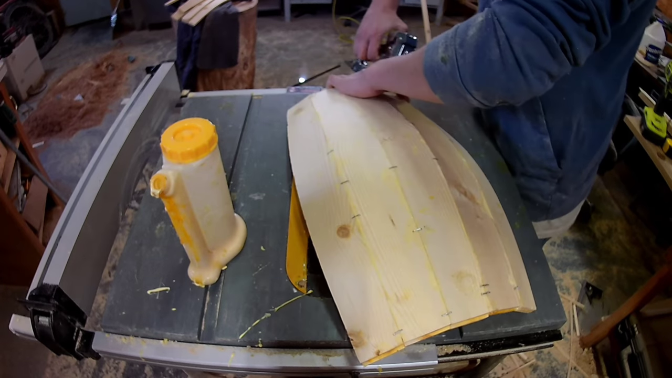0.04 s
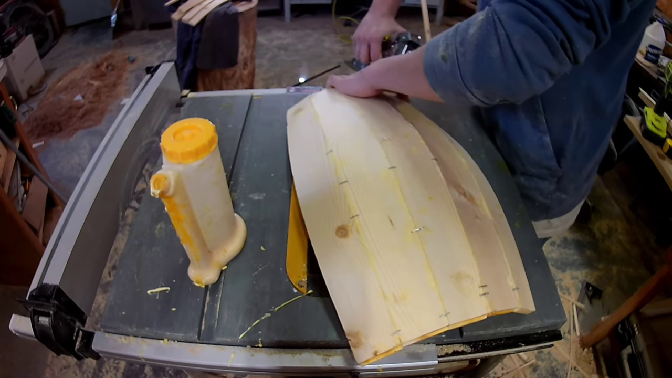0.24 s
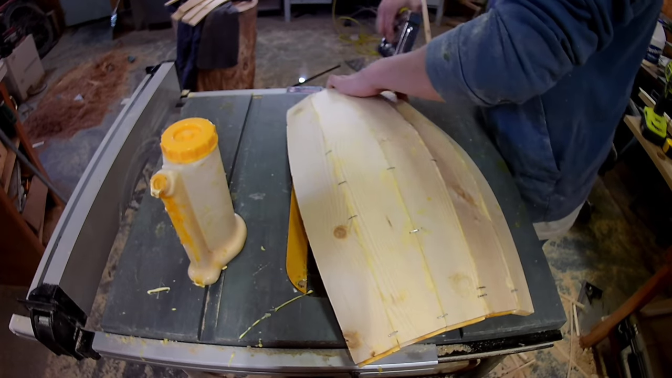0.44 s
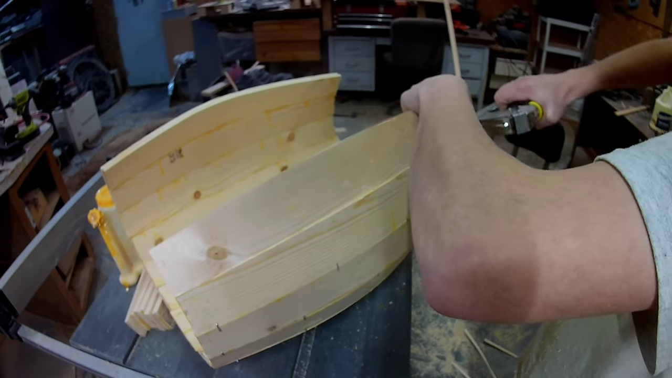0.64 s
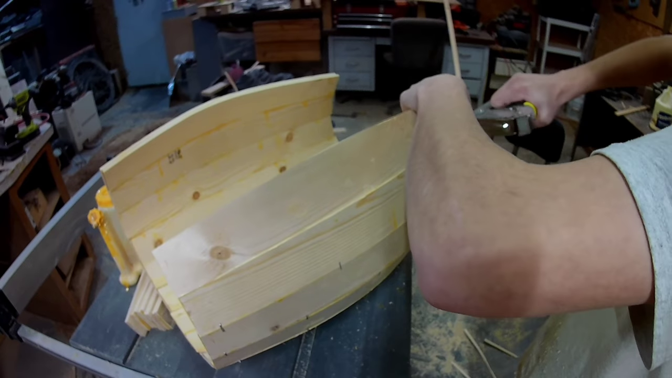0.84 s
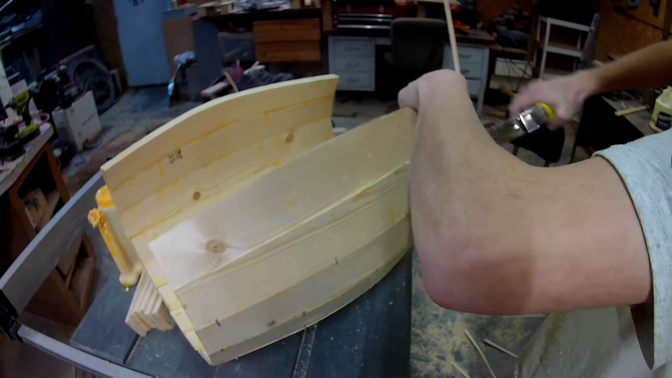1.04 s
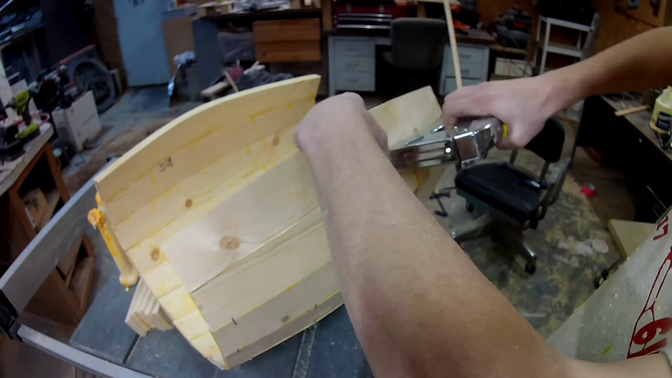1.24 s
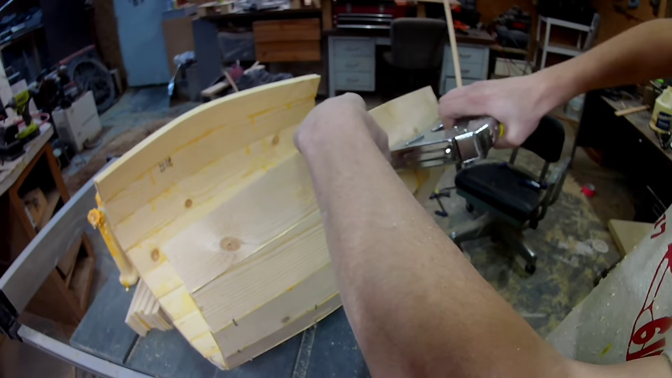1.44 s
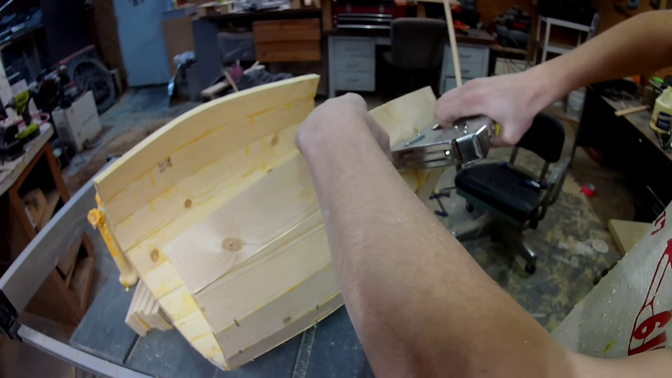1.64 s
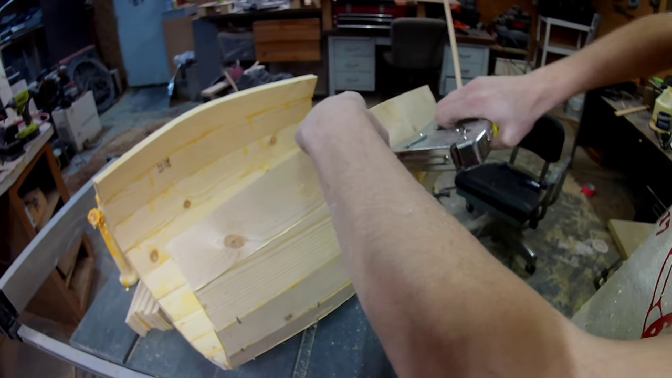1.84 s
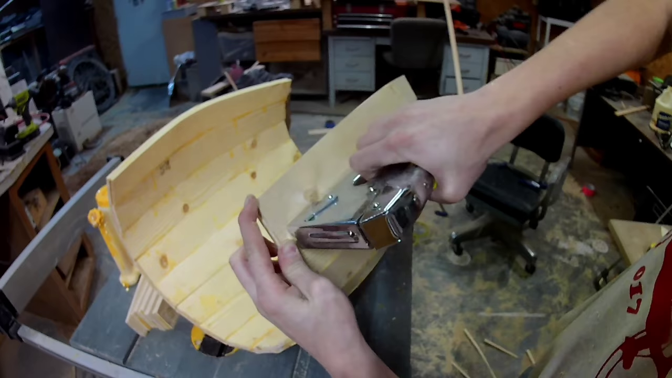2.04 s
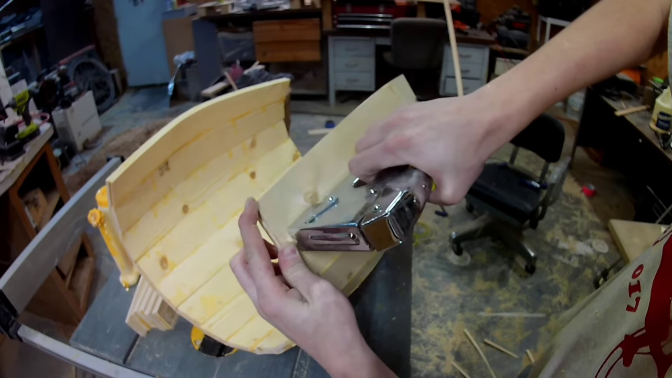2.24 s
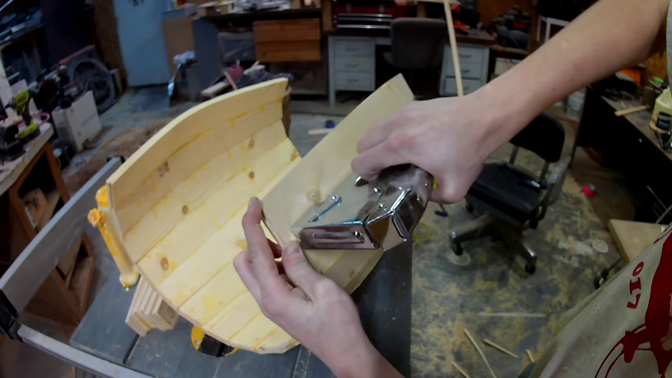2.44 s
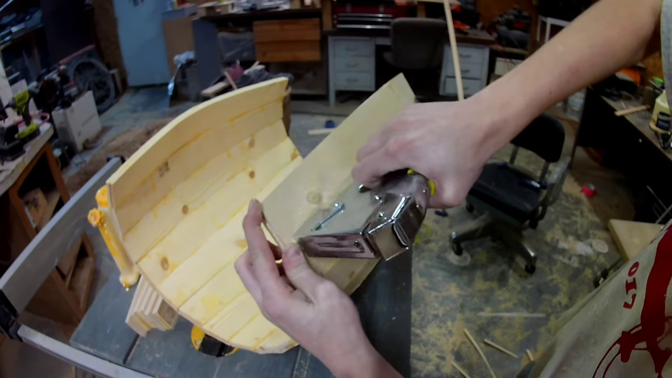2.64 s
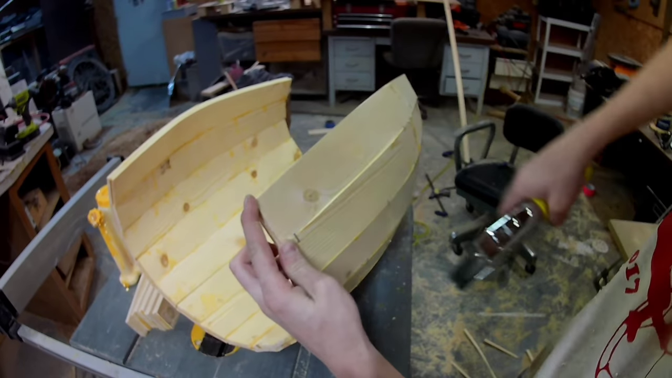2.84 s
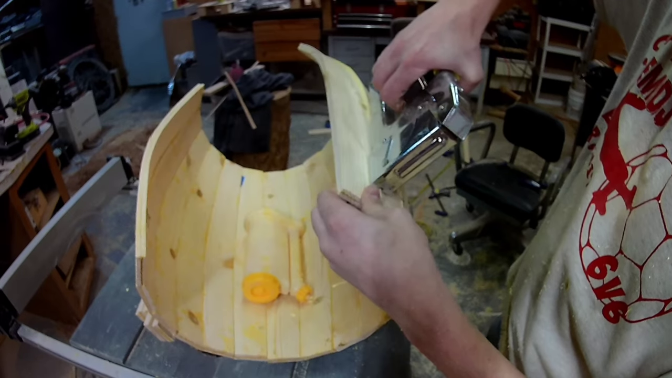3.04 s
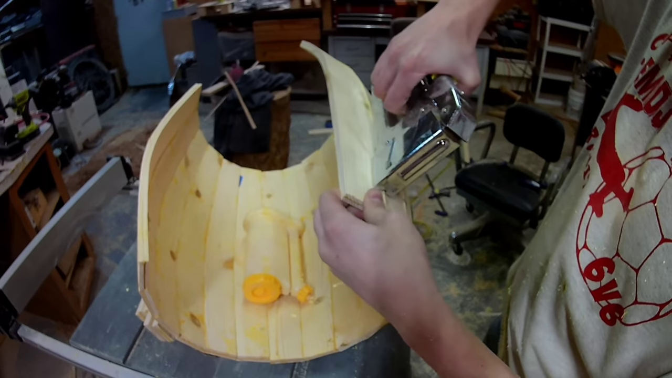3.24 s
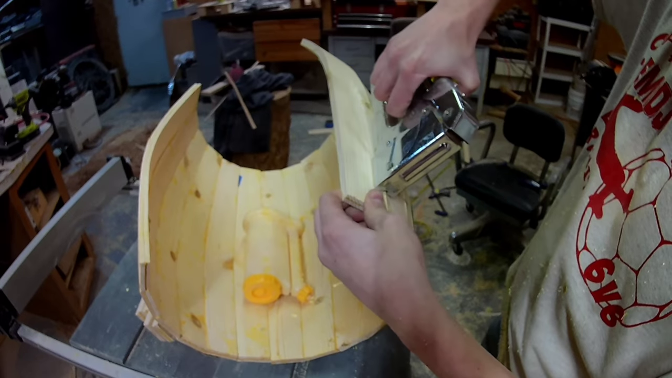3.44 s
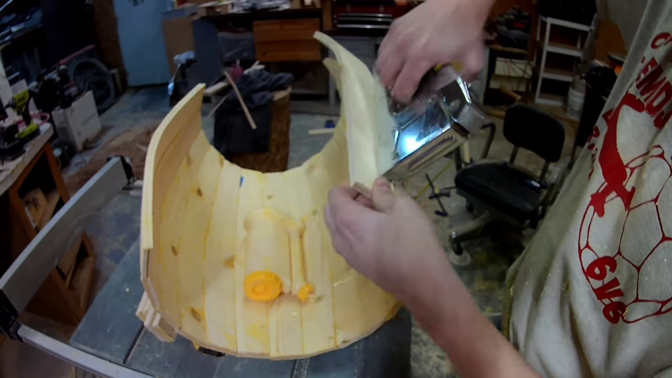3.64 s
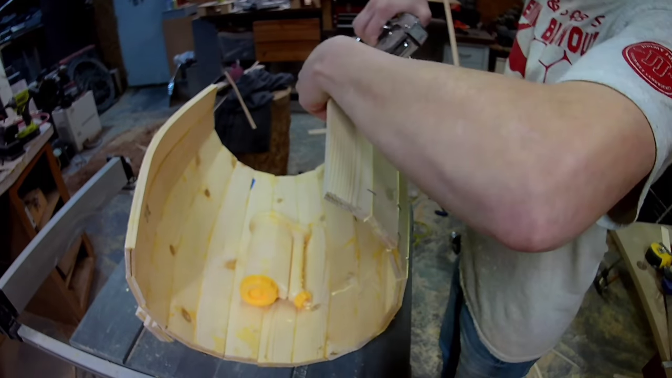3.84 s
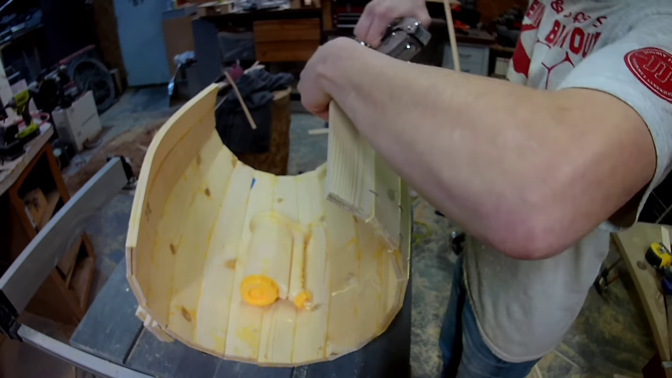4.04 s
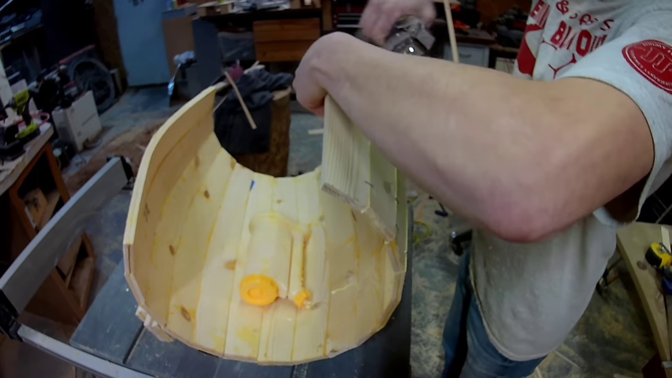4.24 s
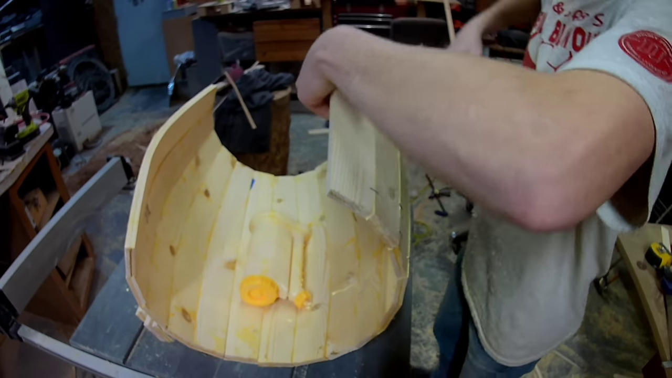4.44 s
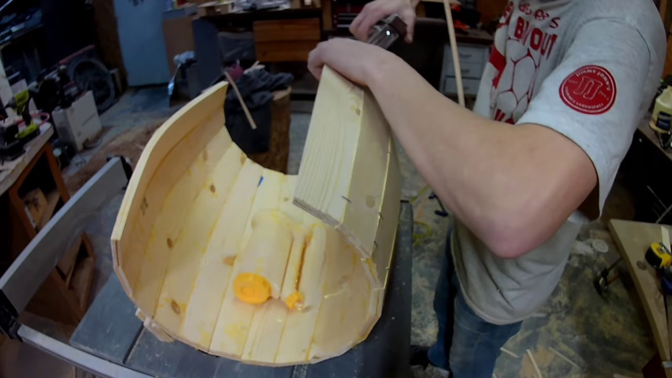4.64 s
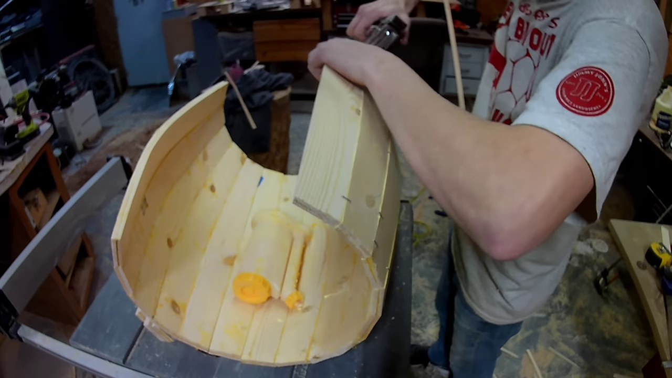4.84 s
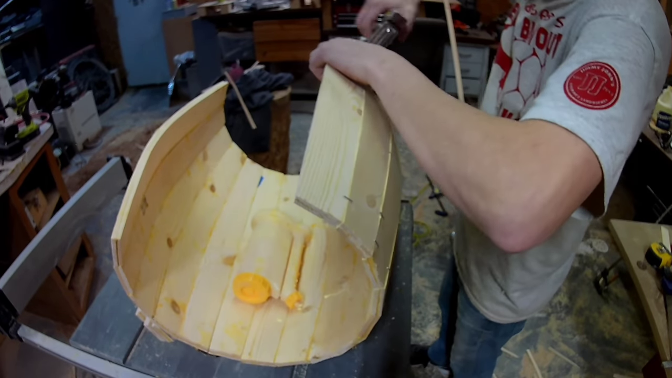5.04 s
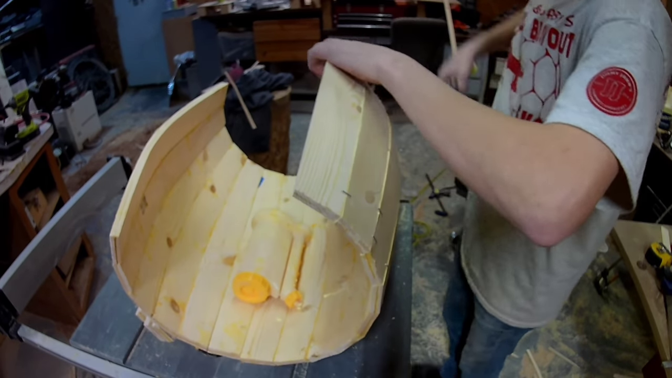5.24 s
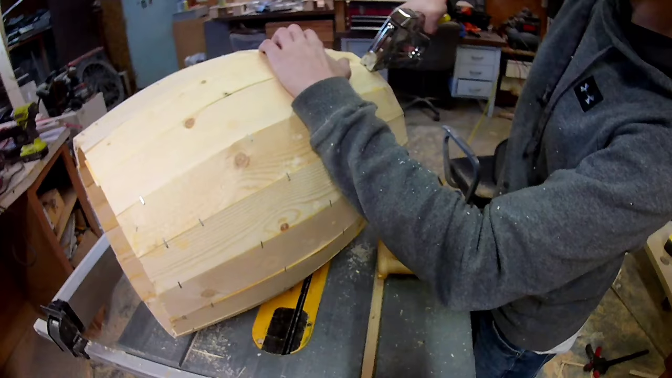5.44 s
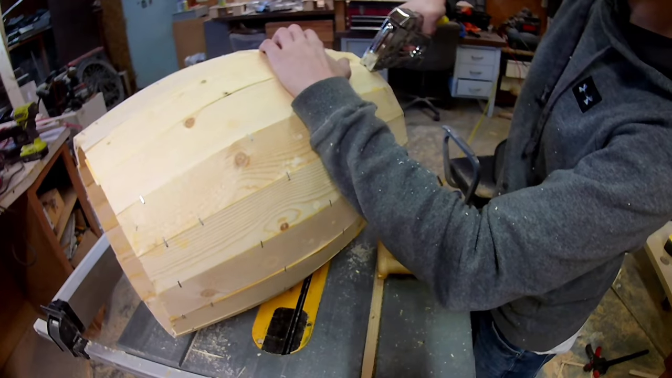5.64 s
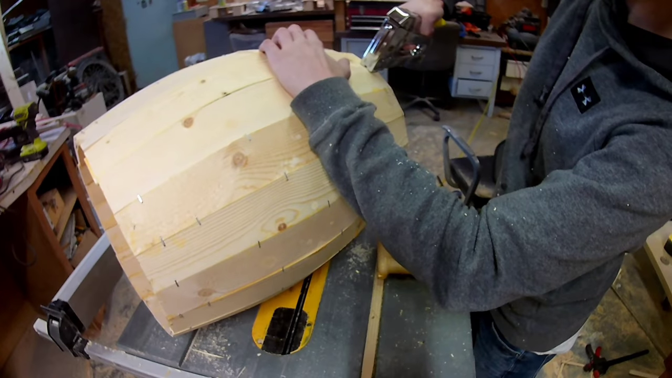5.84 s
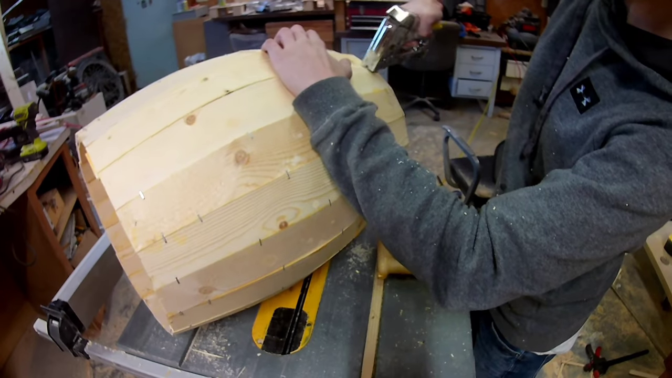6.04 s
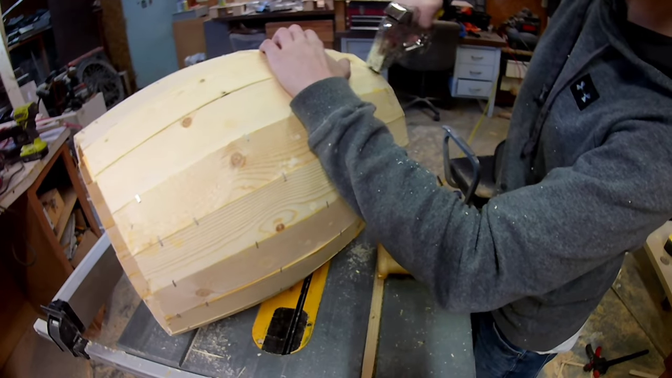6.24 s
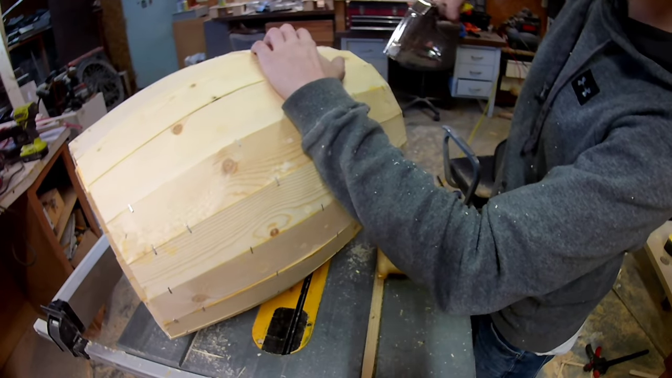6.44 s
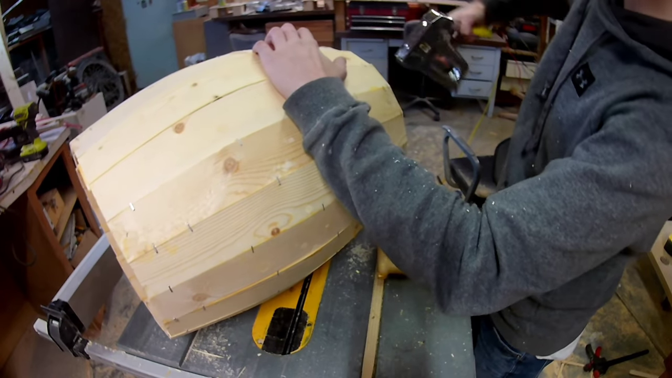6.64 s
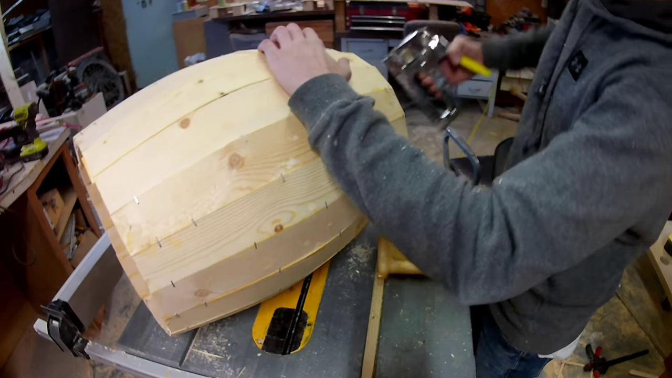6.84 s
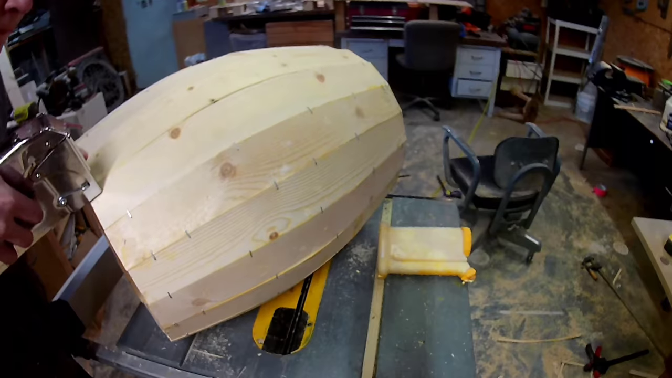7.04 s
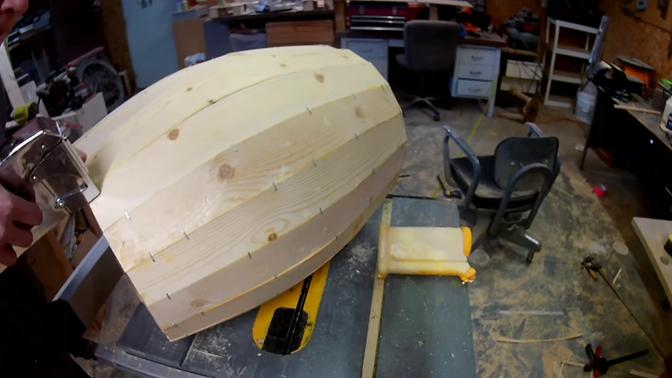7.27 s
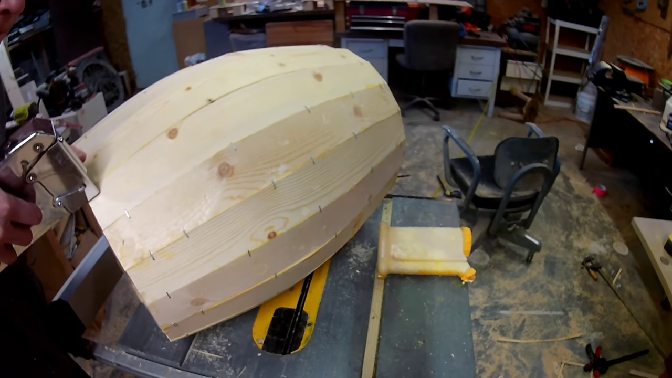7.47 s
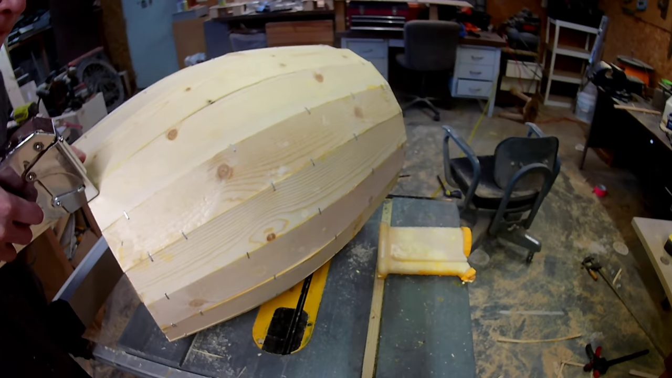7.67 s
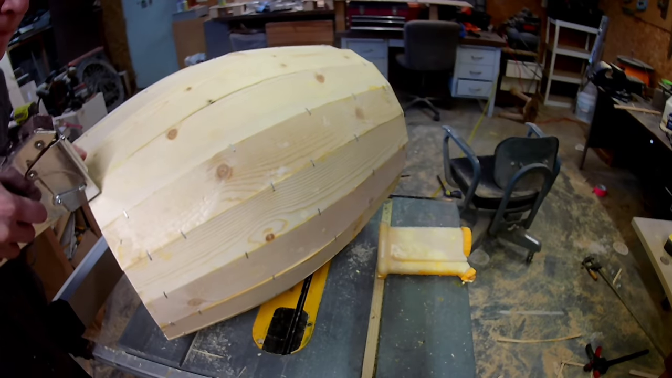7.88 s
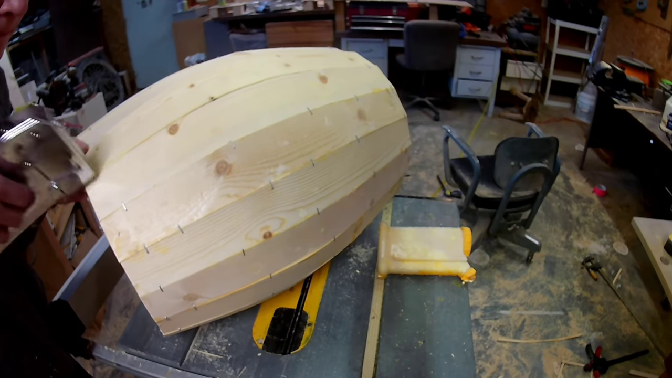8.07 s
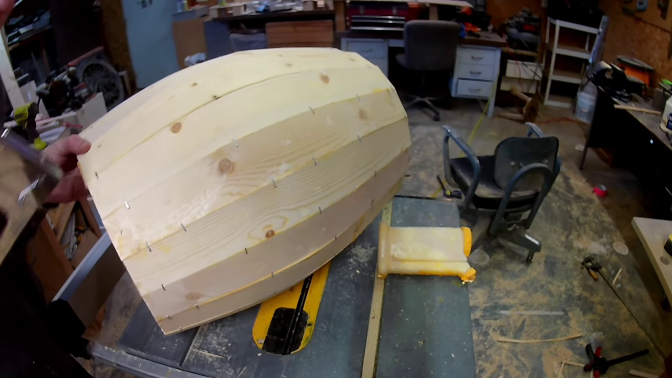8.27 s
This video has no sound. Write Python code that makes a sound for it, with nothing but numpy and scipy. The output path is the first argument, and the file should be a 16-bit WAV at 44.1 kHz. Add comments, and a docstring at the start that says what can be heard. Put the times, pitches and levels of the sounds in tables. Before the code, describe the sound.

Nine spaced staple shots snap and knock into a wooden barrel shell, then ring louder and hollower on the closed barrel over a machine drone.

```python
"""Staple gun on pine staves

In a workshop, a spring staple gun tacks pine staves, first on an open shell, then on a closed barrel.
Each squeeze ticks the catch, drives the striker into the wood and lets the lever clack back; the shop answers.
Behind it, in stretches with abrupt edges: still air, a fan, a humming motor.
Knocks are damped modes, cracks are bursts of coloured noise; the loudest shots overload the microphone.
"""
import sys
import numpy as np
from scipy import signal
from scipy.fft import rfft, irfft, next_fast_len
from scipy.io import wavfile
from scipy.ndimage import map_coordinates

SR = 44100
rng = np.random.default_rng(int(sys.argv[2]) if len(sys.argv) > 2 else 0)


def store_pcm(level_fs):
    """Save levels as 16-bit WAV."""
    pcm = np.round(np.clip(level_fs, -1, 1) * 32767).astype(np.int16)
    wavfile.write(sys.argv[1], SR, np.atleast_2d(pcm).T)


N = 366471
T = np.arange(int(.55 * SR)) / SR  # time axis of one struck sound, s
CLOSED_FROM_S = 5.44  # from here on the work is the closed barrel


def amp(db):
    """Decibels to gain."""
    return 10 ** (np.asarray(db) / 20)


def unit(x):
    """Scale to rms 1."""
    return x / np.sqrt(np.mean(x ** 2) + 1e-20)


def along(points, hz):
    """Read a curve of (f/Hz, value) points on a log frequency axis."""
    f, value = np.transpose(points)
    return np.interp(np.log(hz + 1), np.log(f + 1), value)


def filtered(x, gain):
    """Multiply the spectrum of x by a gain that depends on frequency."""
    n = x.shape[-1]
    padded = next_fast_len(n + 8192)
    hz = np.fft.rfftfreq(padded, 1 / SR)
    return irfft(rfft(x, padded) * gain(hz), padded)[..., :n]


def noise(spectrum, size):
    """Coloured noise of rms 1."""
    return unit(filtered(rng.standard_normal(size), lambda hz: amp(along(spectrum, hz))))


def wobble(rate):
    """A smooth random curve, rate knots a second."""
    knots = rng.standard_normal(int(N * rate / SR) + 4)
    return map_coordinates(knots, [np.arange(N) * rate / SR])


def ring(modes, pitch=1, damping=1):
    """Damped modes; neighbours swing in opposite senses, so the ring takes a moment to build."""
    total = np.zeros(len(T))
    for k, (hz, db, t60) in enumerate(modes):
        decay = amp(db - 60 * T * damping / t60)
        total += (-1) ** k * decay * np.sin(2 * np.pi * hz * pitch * T)
    return total


def burst(spectrum, attack, t60):
    """Countless close modes heard as one dying burst of noise."""
    envelope = (1 - np.exp(-T / attack)) * amp(-60 * T / t60)
    return unit(noise(spectrum, len(T)) * envelope) * np.sqrt(np.mean(envelope ** 2))


def delayed(x, lag):
    """x, lag seconds later."""
    return np.interp(T - lag, T, x, left=0)


def add(track, s, sound):
    """Lay a sound into a track at s seconds."""
    start = round(s * SR)
    track[..., start:start + len(T)] += sound[..., :N - start]


def stretch(start, end):
    """1 between two moments, with edges of a few milliseconds."""
    t = np.arange(N) / SR
    return np.clip(np.minimum(t - start, end - t) / 0.0079, 0, 1)


def hum(tones, waver):
    """Machine tones whose phases wander a little together; waver in radians per Hz of pitch."""
    t = np.arange(N) / SR
    drift = wobble(20)
    total = np.zeros(N)
    for hz, db in tones:
        phase = 2 * np.pi * (hz * t + rng.random()) + waver * hz * drift
        total += amp(db) * np.sqrt(2) * np.sin(phase)
    return total


# when each background is heard: (start t/s, end t/s); the motor runs on past the end
FAN_SPAN, STILL_SPAN, MOTOR_SPAN = (.51, 2.075), (2.072, 5.412), (5.438, 9)

# air of the quiet shop: (f/Hz, relative level/dB per Hz)
STILL_SPECTRUM = [(12, -32), (20, 1.5), (65, -5.5), (95, -2), (113, -4), (153, -5), (247, -9.5),
                  (345, -5.5), (524, -14), (1020, -21.5), (2880, -31), (4200, -33.5), (7000, -44.5),
                  (15800, -47)]


def still_air():
    """Low, steady noise before the fan and again after it."""
    heard = stretch(-1, FAN_SPAN[0]) + stretch(*STILL_SPAN)
    return amp(-63.5) * noise(STILL_SPECTRUM, N) * heard


# rush of the fan: (f/Hz, relative level/dB per Hz)
FAN_SPECTRUM = [(12, -45), (20, -8), (44, -13.5), (81, -3), (133, -9), (167, -4), (345, -3), (603, -6),
                (740, -22.5), (850, -20), (1280, -30), (4000, -42), (7000, -52.5), (15800, -57.5)]
# steady tones of the fan: (f/Hz, rms level/dB)
FAN_TONES = [(166.9, -62.5), (204.6, -62.5), (355.3, -63), (602.9, -75), (721.4, -67)]


def fan():
    """Broad fan noise with a few wavering tones in it."""
    rush = amp(-51.0) * noise(FAN_SPECTRUM, N)
    return (rush + hum(FAN_TONES, waver=0.0015)) * stretch(*FAN_SPAN)


# noise of the motor: (f/Hz, relative level/dB per Hz)
MOTOR_SPECTRUM = [(12, -51.5), (20, -0.5), (55, -13), (167, -10), (292, -8.5), (375, -12.5), (408, -9),
                  (443, -12), (620, -9.5), (733, -5.5), (810, -7), (1250, -21.5), (2900, -37.5),
                  (3700, -34.5), (5200, -45), (6500, -51.5), (15800, -60.5)]
# hum of the motor: (f/Hz, rms level/dB before the swell)
MOTOR_TONES = [(82.6, -62.5), (166.9, -61.5), (204.6, -61), (328.4, -59.5), (414.5, -60), (495.3, -60.5),
               (576, -62), (662.1, -58), (726.7, -48), (823.6, -68), (909.8, -62)]
# slow rise and fall of the motor: (t/s, level/dB)
MOTOR_SWELL = [(5.44, -2.5), (6.0, -1.5), (6.6, -2), (6.85, -2.5), (6.95, 0), (8.31, -1)]


def motor():
    """Machine noise and hum that swell and sink together."""
    swell = amp(np.interp(np.arange(N) / SR, *np.transpose(MOTOR_SWELL)))
    drone = amp(-49.5) * noise(MOTOR_SPECTRUM, N) + hum(MOTOR_TONES, waver=0.00055)
    return swell * drone * stretch(*MOTOR_SPAN)


# the barrel shifts on the bench: (t/s, level/dB)
NUDGES = [(5.469, -43.5), (6.439, -47), (7.02, -48), (7.26, -54.5), (7.78, -53)]
NUDGE_RISE_S, NUDGE_T60_S = 0.035, 1.7


def handling():
    """Each nudge of the barrel starts a low rumble that swells quickly and dies away."""
    rumble = [(15, -12), (45, -2.0), (90, -9), (200, -47), (600, -104)]  # (f/Hz, relative level/dB per Hz)
    starts, levels_db = np.transpose(NUDGES)
    age = np.maximum(np.arange(N) / SR - starts[:, None], 0)
    swells = (1 - np.exp(-age / NUDGE_RISE_S)) * amp(-60 * age / NUDGE_T60_S)
    return amp(levels_db) @ swells * noise(rumble, N) * stretch(*MOTOR_SPAN)


def sleeve():
    """A sleeve brushes past as the arm lifts: one soft swell of dull noise."""
    cloth = [(80, -7.5), (300, 6.5), (700, -1.0), (1400, -26.0), (4000, -29), (12000, -72)]
    swell = np.exp(-((np.arange(N) / SR - 5.3) / 0.05) ** 2)
    return amp(-57.0) * swell * noise(cloth, N)


def dry_tick():
    """One thin tick: a burst of bright noise that dies within milliseconds."""
    track = np.zeros(N)
    bright = [(300, -12), (1500, 0), (5000, -0.5), (15000, -10.5)]
    add(track, 6.889, amp(-49.5) * burst(bright, attack=0.00022, t60=.005))
    return track


def background():
    """Everything behind the staple gun."""
    return still_air() + fan() + motor() + handling() + sleeve() + dry_tick()


# how long the shop rings: (f/Hz, t60/s before the length factor)
SHOP_DECAY = [(100, 0.29), (400, 0.29), (900, 0.26), (2500, 0.27), (5000, 0.19), (9000, 0.15),
              (15000, 0.18)]


def shop(x, length, build):
    """The shop's answer: it builds up from the nearest walls, and each frequency dies at its own speed."""
    hz, t, z = signal.stft(rng.standard_normal(len(T)), SR, nperseg=256)
    t60 = length * along(SHOP_DECAY, hz)[:, None]
    tail = signal.istft(z * amp(-60 * t / t60), SR, nperseg=256)[1][:len(T)]
    tail = tail * (1 - np.exp(-(T / build) ** 2))
    return signal.fftconvolve(x, tail / np.linalg.norm(tail))[:len(T)]


# the gun's steel: (f/Hz, relative level/dB per Hz; for the spring's modes, level/dB)
STEEL_SPECTRUM = [(300, -20), (1200, -1), (2400, 2.5), (2950, -8), (3550, 3), (4200, -4.5), (5200, -4),
                  (6100, -16), (7100, -23.5), (8000, -24.5), (9700, -22.5), (12000, -30), (15500, -35)]
# the gun's steel housing, damped by the hand: (f/Hz, relative level/dB, t60/s)
HOUSING_MODES = [(2068, -15.5, .1), (2270, -17.5, .1), (2426, -16.5, 0.21), (2717, -22.5, .1),
                 (3490, -21.5, 0.16), (3520, -27.5, 0.35), (3700, -24.5, 0.1), (3900, -25.5, .11),
                 (4350, -37, 0.37), (4700, -20, 0.23), (4700, -25, 0.16), (5380, -28, .14),
                 (5860, -31, .13), (6200, -27.5, .13)]


def gun_ring(spring_db, housing_db, t60, count=40):
    """The gun's own ring: the housing's modes, damped by the hand, and the spring's many small ones."""
    draw = rng.random((count, 2))
    hz = 2500 + 12000 * (np.arange(count) + draw[:, 0]) / count
    level_db = along(STEEL_SPECTRUM, hz) + 10 * (draw[:, 1] - .5)
    spring = ring([(f, db, t60) for f, db in zip(hz, level_db)])
    return amp(spring_db) * spring + amp(housing_db) * ring(HOUSING_MODES)


def steel(metal, attack, t60, rebound_db, buzz_db):
    """Steel on steel: a short snap, its rebound, the buzz of loose parts and the ring of the gun."""
    snap = burst(STEEL_SPECTRUM, attack, t60)
    rebound = amp(rebound_db) * delayed(burst(STEEL_SPECTRUM, attack, t60), lag=.007)
    buzz = amp(buzz_db) * burst(STEEL_SPECTRUM, attack=0.001, t60=0.094)
    return snap + rebound + buzz + metal * (1 - np.exp(-T / attack))


# bending modes of the glued staves: (multiple of the knock pitch, relative level/dB, t60/s before damping)
STAVE_MODES = [(.36, -22.5, 0.086), (.6, -15.5, 0.076), (.82, -3.5, 0.061), (1, -1.5, .06),
               (1.16, -5, 0.081), (1.4, -8, 0.029)]
# cross-grain modes of the struck plank: (multiple of its pitch, relative level/dB, t60/s before damping)
PLANK_MODES = [(.88, -8.5, 0.017), (1, 1, 0.059), (1.18, -6, 0.026), (1.45, -17, .03)]
# clatter of struck wood: (f/Hz, relative level/dB per Hz)
WOOD_SPECTRUM = [(25, -32), (70, -15.5), (140, -3.5), (270, -3.5), (600, 4.5), (1100, -3), (1500, -7.5),
                 (2400, -17), (3200, -25), (8000, -53.5)]
# the driving spring: (f/Hz, relative level/dB per Hz)
ZING_SPECTRUM = [(2500, -36), (5000, -1), (6400, 3.5), (7200, 2.5), (8000, -15.5), (9700, -7), (12000, -21),
                 (15500, -22.5)]
BARREL_KNOCK_DB = -6  # a light contact hardly moves the stiff, closed barrel


def contact(metal, ring_hz, ring_db, knock_db, steel_db, closed):
    """A light contact inside the gun: a steel click, with the plank and the staves answering under it."""
    knock = amp(knock_db + BARREL_KNOCK_DB * closed)
    plank = amp(ring_db) * ring(PLANK_MODES, ring_hz, damping=1.5)
    body = plank + amp(-4.5) * knock * ring(STAVE_MODES, 430, damping=1.1)
    clatter = amp(-4) * knock * burst(WOOD_SPECTRUM, attack=0.00057, t60=0.037)
    wood = body * (1 - np.exp(-T / 0.0007)) + clatter
    tick = steel(amp(-7.5) * metal, attack=0.0016, t60=0.038, rebound_db=-7.5, buzz_db=-14.5)
    # close to the barrel's end the spring's twang is heard too
    twang = amp(-9) * burst(ZING_SPECTRUM, attack=.001, t60=.03) * closed
    direct = wood + amp(steel_db - 1.0) * delayed(tick + twang, lag=0.0005)
    return direct + amp(-7.5) * shop(direct, .95 if closed else .48, build=0.014)


# the catch ticks under the squeeze: (t/s, level/dB, hardness/dB: more steel and less plank)
CATCH_TICKS = [(0.8448, -44, 0.5), (1.7094, -47.5, -3), (2.4247, -41, -8), (2.525, -55, -5),
               (3.4983, -39, -2), (4.1060, -42.5, -0.5), (4.878, -43.5, 2), (5.9860, -48, 1),
               (7.6860, -42, -9.5)]
CATCH_HZ, CATCH_KNOCK_DB = 990, 5  # pitch of the plank under the gun's nose; lift of the staves' knock


def catch_ticks(metal):
    """The catch ticks as the lever is squeezed: a contact with its own share of steel and plank each time."""
    track = np.zeros(N)
    for s, db, hard_db in CATCH_TICKS:
        tick = contact(metal, CATCH_HZ, -hard_db, CATCH_KNOCK_DB, hard_db, s > CLOSED_FROM_S)
        add(track, s, amp(db) * tick)
    return track


# the lever clacks back: (t/s, level/dB, plank ring f/Hz, lift of the knock on the wood/dB)
LEVER_CLACKS = [(2.0287, -40.5, 1340, -2), (2.041, -44.5, 1270, -3), (2.785, -56, 1340, 1),
                (2.8468, -36, 1250, -8), (4.4548, -42, 1058, 14), (4.470, -46, 1560, 2),
                (4.490, -53, 1480, 3.5), (6.4445, -22, 1195, -18), (8.218, -22, 1255, -5.5)]
CLACK_HARDNESS_DB = -9  # the share of steel in a clack


def lever_clacks(metal):
    """The lever clacks back when let go, ringing the plank and knocking the staves."""
    track = np.zeros(N)
    for s, db, ring_hz, knock_db in LEVER_CLACKS:
        clack = contact(metal, ring_hz, 0, knock_db, CLACK_HARDNESS_DB, s > CLOSED_FROM_S)
        add(track, s, amp(db) * clack)
    return track


SLIP_S, SLIP_T60_S = .011, .04  # the striker slips free this long before it lands; decay after landing
SLIP_DB = -17  # relative to the crack


def slip():
    """The striker scrapes down its guide, louder as it gathers speed."""
    envelope = np.minimum(T / SLIP_S, 1) * amp(-60 * np.maximum(T - SLIP_S, 0) / SLIP_T60_S)
    return envelope * (noise(STEEL_SPECTRUM, len(T)) + amp(2.5) * noise(WOOD_SPECTRUM, len(T)))


# the work, open or closed: (hollow ring relative to the wood/dB, stave damping, room level/dB, room t60 factor)
ON_SHELL, ON_BARREL = (-1, 1.35, -9, 0.867), (0.5, 1.26, -7, 1.73)
# the crowded modes of the open shell: (f/Hz, relative level/dB per Hz)
SHELL_SPECTRUM = [(80, -34), (135, -9), (200, -12), (320, -3.5), (420, 3), (520, -4), (650, -16.5),
                  (780, -25.5), (1500, -40.5), (4000, -82)]
# the crowded modes of the closed barrel: (f/Hz, relative level/dB per Hz)
BARREL_SPECTRUM = [(120, -42), (250, -3), (370, -12), (520, -4), (700, -6), (820, 2), (1020, 1), (1230, -5),
                   (1500, -36), (2400, -29), (3000, -33.5), (8000, -77.5)]
# the bench under the work: (f/Hz, relative level/dB, t60/s)
BENCH_MODES = [(86.5, -12.5, 0.037), (138, -0.5, 0.047), (187, 0.5, 0.034), (245, -4, 0.016)]
FIRM_RISE_S = .001  # rise time on a firmly backed stave
THUMP_DB, THUMP_DB_PER_DOUBLING = -11, -8  # bench thump at that rise; its change as the rise time doubles
KNOCK_LAG_PER_RISE = 1.1  # the knock follows the crack by this many rise times


def staves(rise, wood_db, knock_hz, knock_db, plank_hz, plank_db, closed):
    """The plank rings and clatters, then the staves knock and the bench thumps, less where they give way."""
    hollow_db, damping = (ON_BARREL if closed else ON_SHELL)[:2]
    thump_db = THUMP_DB + THUMP_DB_PER_DOUBLING * np.log2(rise / FIRM_RISE_S)
    knock = amp(knock_db) * ring(STAVE_MODES, knock_hz, damping) + amp(thump_db) * ring(BENCH_MODES)
    plank = amp(plank_db) * ring(PLANK_MODES, plank_hz) * (1 - np.exp(-T / rise))
    if closed:
        hollow = burst(BARREL_SPECTRUM, attack=0.0045, t60=0.27)
    else:
        hollow = burst(SHELL_SPECTRUM, attack=0.00082, t60=.2)
    clatter = burst(WOOD_SPECTRUM, attack=rise + 0.00043, t60=0.084)
    wood = amp(wood_db) * (clatter + amp(hollow_db) * hollow)
    return delayed(knock, KNOCK_LAG_PER_RISE * rise) + plank + wood


CRACK_TILT_DB_PER_OCTAVE = -1.5  # about 3 kHz, level below 1 kHz
ZING_DB, ZING_GROWS, ZING_T60_S = -12, 2.4, .14  # spring at a 0 dB crack; its dB per dB of crack; decay


def striker(metal, rise, steel_db):
    """The striker cracks on the staple; the harder the crack, the more the spring zings."""
    def tilt(hz):
        return amp(CRACK_TILT_DB_PER_OCTAVE * np.log2(np.maximum(hz, 1000) / 3000))
    crack = amp(steel_db) * steel(metal, rise, t60=0.035, rebound_db=-7.5, buzz_db=-11.0)
    zing = amp(ZING_DB + ZING_GROWS * steel_db) * burst(ZING_SPECTRUM, attack=rise, t60=ZING_T60_S)
    return filtered(crack, tilt) + zing


# shots: (t/s, rise/s: long where the stave gives way, wood level/dB, steel level/dB,
#         knock f/Hz, knock level/dB, plank f/Hz, plank level/dB)
SHOTS = [(0.2120, .0015, -5, -11.5, 488, 5.5, 1347, -10.5),
         (0.8785, .0013, -15, -20, 364.6, -4.5, 933, -5.5), (1.7605, .001, -15.5, -18, 402.6, 2, 1186, -24),
         (2.5610, 0.0049, -13, -19, 324.5, -1, 931.5, -10), (3.5400, .0052, -16, -17, 416, 0, 885.5, 1.5),
         (4.1635, .0035, -15.5, -21, 414, -7.5, 961, -16),
         (4.9165, 0.00279, -18, -18.5, 393, -9, 895, -15.5), (6.0401, .0012, -6.5, -8, 270.7, 2.5, 842, 0),
         (7.7935, .0025, -5, -5.5, 296.6, -13, 846, 1.5)]
# how the room differs between the microphone ports: (f/Hz, side level/dB before the overall side level)
SIDE_SPECTRUM = [(200, -50), (1000, -44.5), (2500, -22.5), (4500, -15), (8000, -1), (14000, 1.5)]
SIDE_DB = -7  # overall side level


def shots(metal):
    """Each shot: the striker slips free, lands on steel and wood, and the shop answers."""
    track = np.zeros((2, N))
    for s, rise, wood_db, steel_db, knock_hz, knock_db, plank_hz, plank_db in SHOTS:
        closed = s > CLOSED_FROM_S
        room_db, length = (ON_BARREL if closed else ON_SHELL)[2:]
        add(track, s - SLIP_S, amp(steel_db + SLIP_DB) * slip())
        wood = staves(rise, wood_db, knock_hz, knock_db, plank_hz, plank_db, closed)
        direct = wood + striker(metal, rise, steel_db)
        mid = direct + amp(room_db) * shop(direct, length, build=0.0069)
        # mostly the treble differs between the two microphone ports
        spread = shop(direct, .5, build=.001)
        side = amp(SIDE_DB) * filtered(spread, lambda hz: amp(along(SIDE_SPECTRUM, hz)))
        add(track, s, np.array([mid + side, mid - side]))
    return track


PAUSE = (.477, .51)  # (start t/s, end t/s)


def scene():
    """The gun straight ahead of the microphone, the shop behind; all sound stops briefly after the first shot."""
    metal = gun_ring(spring_db=-20.5, housing_db=-8, t60=0.036)
    gun = catch_ticks(metal) + lever_clacks(metal) + shots(metal)
    return (background() + gun) * (1 - stretch(*PAUSE))


CEILING, BASS_HZ, TOP_HZ = .92, 28, 15850  # overload level (full scale 1); low corner and band limit, Hz


def record(dry):
    """The microphone flattens the loudest peaks, thins the deep bass and keeps nothing above its band limit."""
    clipped = dry / (1 + np.abs(dry / CEILING) ** 6) ** (1 / 6)
    return filtered(clipped, lambda hz: 1j * hz / (BASS_HZ + 1j * hz) * (hz < TOP_HZ))


dry = scene()
out = record(dry)
store_pcm(out)
```